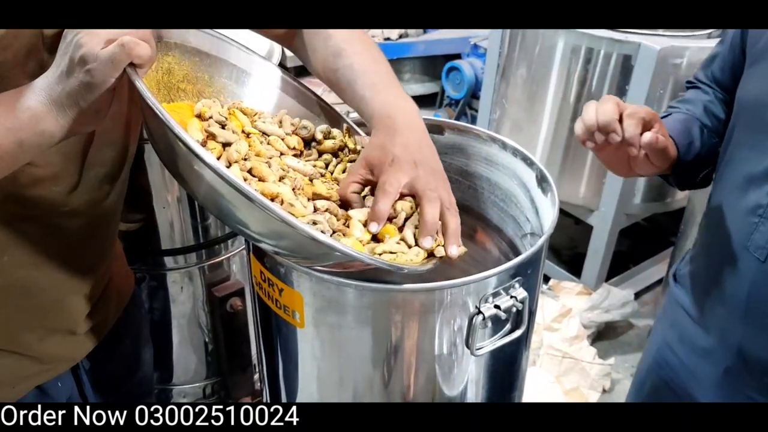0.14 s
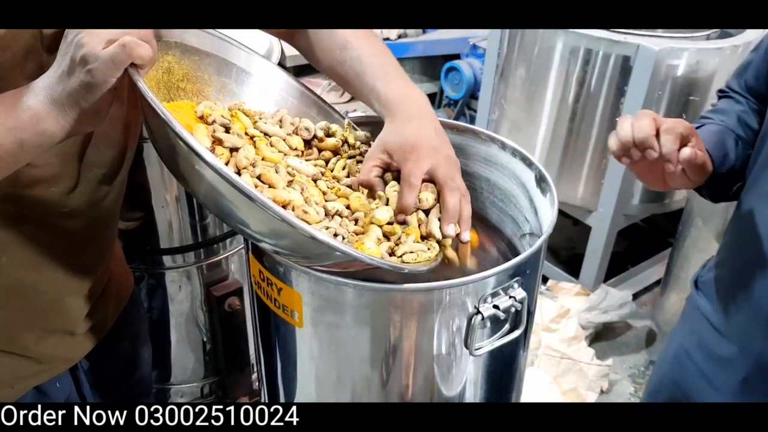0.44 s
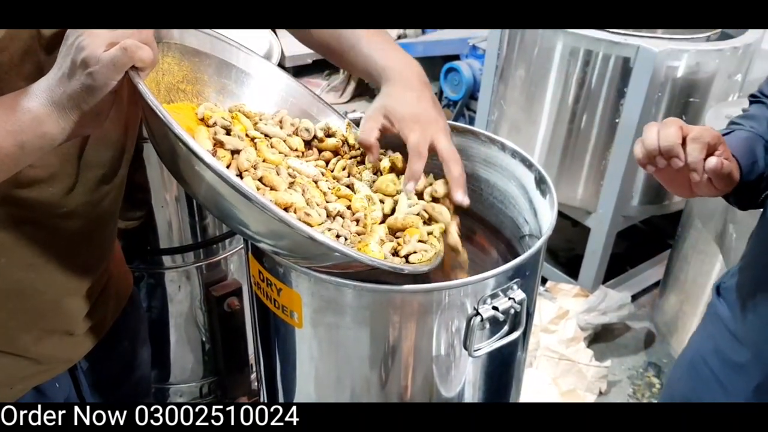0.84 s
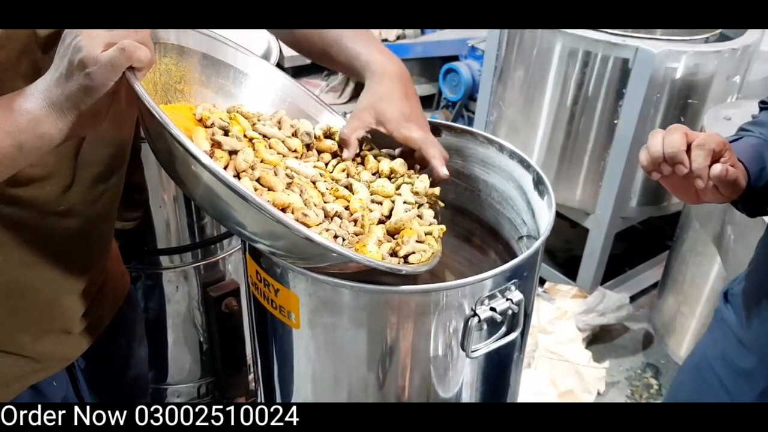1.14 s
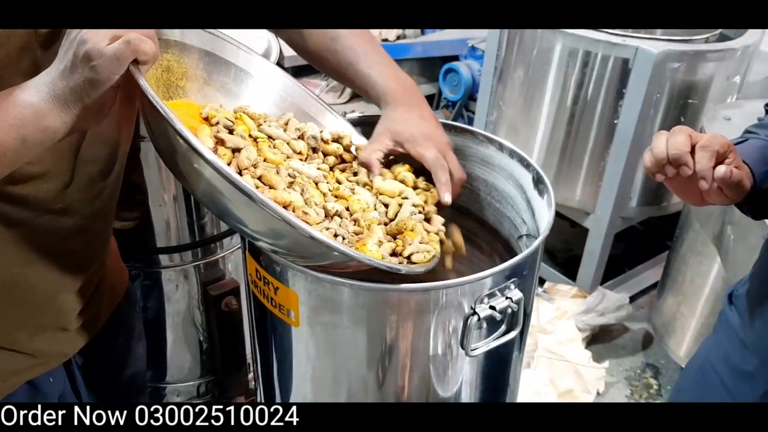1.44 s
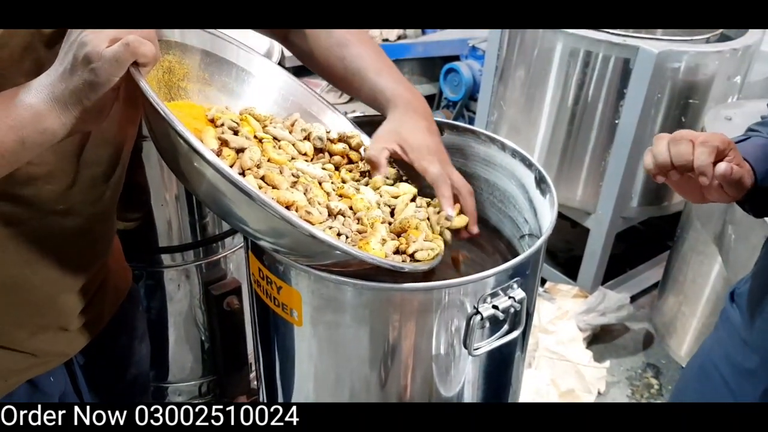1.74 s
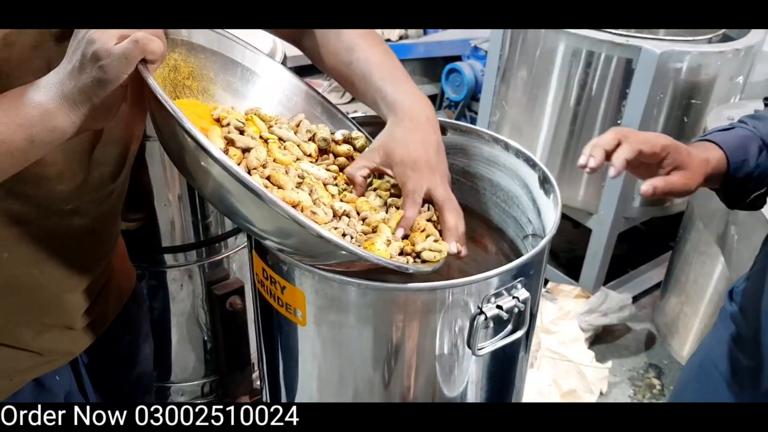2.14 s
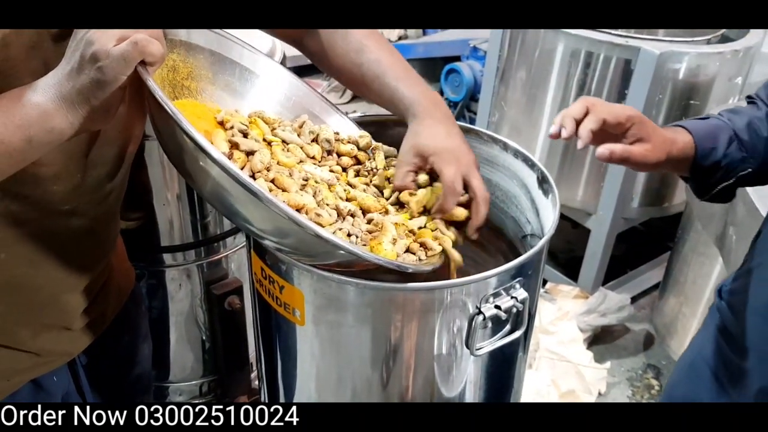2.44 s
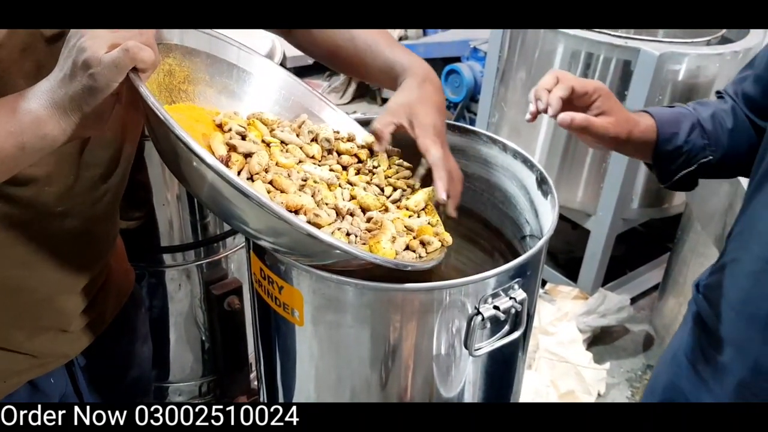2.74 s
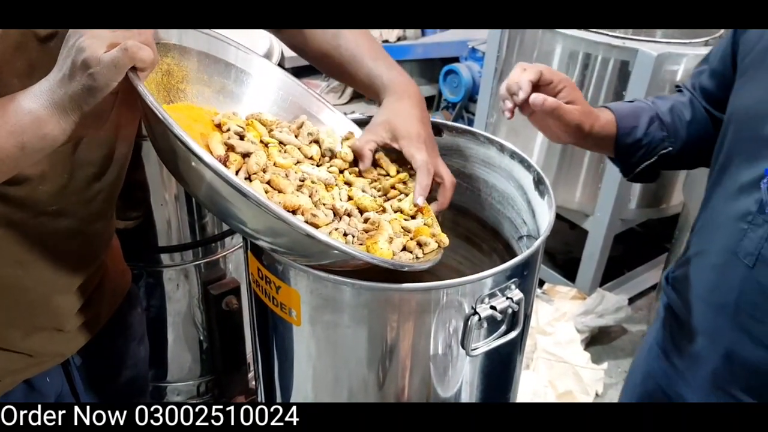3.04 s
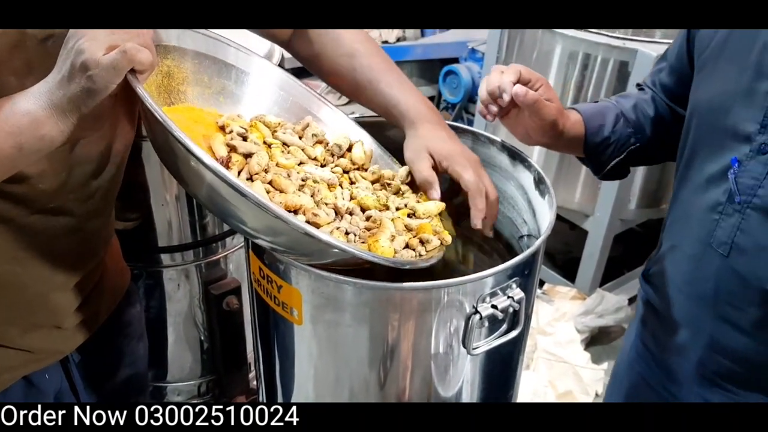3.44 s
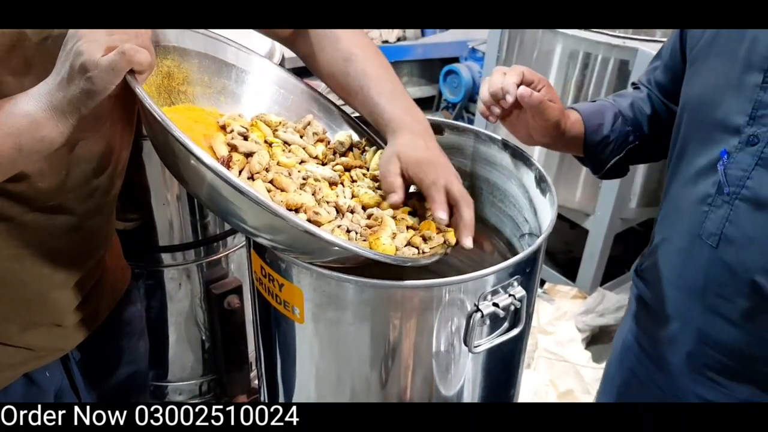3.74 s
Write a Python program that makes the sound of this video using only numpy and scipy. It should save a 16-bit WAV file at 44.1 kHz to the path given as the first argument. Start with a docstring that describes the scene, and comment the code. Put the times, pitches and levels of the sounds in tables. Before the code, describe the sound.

Close mono pickup of dry woody roots clattering into a steel drum, bright pings over hollow knocks, coming in waves, then sparse skids and a final small drop, with faint low workshop noise beneath.

```python
"""Hard dried roots are raked by hand from a steel bowl into the metal drum of a grinder.
From the start they ping on the steel (ringing modes), thud on the bottom (a short tone and modes) and
clack together (coloured noise), over a rattle of tiny random contacts that comes in waves and thins out.
Towards the end short noise rasps and squeaks skid on the bowl, and a few last roots land.
The hollow drum rings on after the hits; throughout, the workshop is dull noise with a faint hum now and then."""
import sys
import numpy as np
from scipy import signal
from scipy.fft import rfft, irfft, next_fast_len
from scipy.io import wavfile

SR = 44100
rng = np.random.default_rng(int(sys.argv[2]) if len(sys.argv) > 2 else 0)


def transcribe(u):
    """Save the signal u as a 16-bit wav file named by the first command-line argument.

    u: samples, shape (n,) or (channels, n), limited to [-1, 1]; the rate is SR.
    q: integer samples, one column per channel.
    """
    v = np.clip(np.atleast_2d(u).T, -1, 1)
    q = np.round(v * 32767).astype(np.int16)
    wavfile.write(sys.argv[1], SR, q)


N = 171990  # length of the scene, samples
T = np.arange(int(.55 * SR)) / SR  # time within one hit, s


def amp(db):
    """Decibels to gain."""
    return 10 ** (np.asarray(db) / 20)


def unit(x):
    """Scale to rms 1."""
    return x / np.sqrt(np.mean(x ** 2) + 1e-20)


def along(points, hz):
    """Read (f/Hz, value) points on a log frequency axis."""
    point_hz, value = np.transpose(points)
    return np.interp(np.log(hz + 1), np.log(point_hz + 1), value)


def near(hz, centre_hz, octaves):
    """Bell-shaped weight around a pitch."""
    return np.exp(-.5 * (np.log2((hz + 1) / centre_hz) / octaves) ** 2)


def fade(t60):
    """Exponential decay over the length of one hit, losing 60 dB in t60 seconds."""
    nepers = T.astype(np.float32) * np.float32(-np.log(1000) / max(t60, 1e-3))
    return np.exp(np.maximum(nepers, -30))


def add(track, s, sound):
    """Mix a sound into a track at a time in seconds."""
    part = track[max(round(s * SR), 0):][:len(sound)]
    part += sound[:len(part)]


def colour(x, db_of_hz):
    """Causal minimum-phase filter with the given gain curve, built by folding its cepstrum."""
    m = 2 * next_fast_len(len(x) // 2 + 1024)
    gain = amp(db_of_hz(np.fft.rfftfreq(m, 1 / SR)))
    cepstrum = irfft(np.log(gain), m)
    cepstrum[1:m // 2] *= 2
    cepstrum[m // 2 + 1:] = 0
    return irfft(rfft(x, m) * np.exp(rfft(cepstrum)), m)[:len(x)]


def noise(points, size):
    """Coloured noise of rms 1."""
    return unit(colour(rng.standard_normal(size), lambda hz: along(points, hz)))


def burst(points, t60, size=6000):
    """A short dying puff of coloured noise."""
    return noise(points, size=size) * fade(t60)[:size]


def ring(modes, boost_db, scatter_db):
    """Decaying sine modes struck with fresh strengths and phases; starts at about rms 1."""
    mode_hz, mode_db, mode_t60 = np.transpose(modes)
    chance = rng.standard_normal((len(mode_hz), 2))
    gains = amp(mode_db + boost_db + scatter_db * chance[:, 0])
    gains *= np.sqrt(2) / np.linalg.norm(gains)
    out = 0
    for gain, hz, turn, t60 in zip(gains, mode_hz, chance[:, 1], mode_t60):
        phase = (2 * np.pi * hz * T + np.pi * turn).astype(np.float32)
        out = out + gain * np.sin(phase) * fade(t60)
    return out


# how long the steel wall rings (f/Hz, t60/s)
STEEL_T60 = [(3800, 0.4), (5300, 0.31), (7000, 0.27), (10000, 0.17), (15000, 0.23)]


def wall(mode_hz, mode_db):
    """Rows of (f/Hz, level/dB, t60/s) for the steel wall."""
    return np.column_stack([mode_hz, mode_db, along(STEEL_T60, np.array(mode_hz))])


# how long the hollow drum echoes (f/Hz, t60/s)
DRUM_ECHO_T60 = [(150, 0.15), (500, 0.56), (1000, 0.89), (2800, 0.75), (5000, 0.63), (8000, 0.32),
                 (14000, 0.31)]
EARLY_T60_S = .09  # decay of the first reflections


def drum(x, early_db, tail_db, size=256):
    """Sound inside the drum: dense first reflections and a long hollow tail, drawn afresh each time."""
    # the tail is noise in short blocks, each frequency dying at its own speed
    blocks = rng.standard_normal((len(T) // size + 1, size))
    t = np.arange(len(blocks))[:, None] * size / SR
    decay = np.exp(-np.log(1000) * t / along(DRUM_ECHO_T60, np.fft.rfftfreq(size, 1 / SR)))
    tail = irfft(rfft(blocks) * decay).ravel()[:len(T)]
    early = rng.standard_normal(len(T)) * fade(EARLY_T60_S)
    answer = amp(early_db) * unit(early) + amp(tail_db) * unit(tail)
    answer[0] += np.sqrt(len(T))  # the direct sound
    return signal.fftconvolve(x, unit(answer) / np.sqrt(len(T)))[:max(len(x), len(T))]


# colour of dry root on root or bowl (f/Hz, level/dB)
ROOT_COLOUR = [(200, -23.5), (700, 5.5), (1600, -5), (3200, 2.5), (5000, 1.5), (7000, 0), (10000, -7),
               (15000, -28)]


def woody(hz, favour_db, octaves, size=6000, dull_db=7):
    """Noise in the colour of one dry root; dull_db is its loss per octave above the pitch."""
    def tone(f):
        dulling = dull_db * np.log2(np.maximum(f / hz, 1))
        return along(ROOT_COLOUR, f) + favour_db * near(f, hz, octaves) - dulling
    return unit(colour(rng.standard_normal(size), tone))


# roots striking steel (t/s, level/dB, f/Hz favoured by the spot that is hit,
# relative treble level/dB, level/dB of the part left ringing freely, at most 0)
PINGS = [(0.0094, -10, 3760, -16.5, -13), (0.0604, -9.5, 5480, -6.5, -3), (0.0768, -3, 7200, -16.5, -5.5),
         (0.0883, -6.5, 4350, -24, -8.5), (0.142, -16.5, 5350, -23, 0), (0.2562, -5, 5920, -11, -4),
         (0.2942, -5, 4300, -10.5, -4), (0.379, -5, 5100, -15, -10), (0.417, -14.5, 4650, -9, 0.5),
         (0.5067, -6, 6340, -5, -8.5), (0.5441, -9, 4800, -14, -1.5), (0.573, -11.5, 4570, -7, -6),
         (0.653, -18, 3840, -7.5, -1.5), (0.7207, -5.5, 5110, -17, -8.5), (0.7317, -7, 3840, -13, -7.5),
         (0.841, -9, 4170, -13, -13), (0.8617, -3.5, 6240, -11, -11), (0.9174, -6, 4100, -9.5, -8),
         (0.9697, -8.5, 6000, -25, -11), (1.059, -12, 6400, -4, -10), (1.2044, -8.5, 4200, -9, -14.5),
         (1.282, -16, 4580, -35, -14), (1.4047, -17, 4230, -8.5, -17), (1.6297, -10.5, 6800, -6.5, -14.5),
         (1.8683, -9.5, 4700, -10.5, -10), (1.9246, -28, 5140, 3, 3), (1.966, -5, 5880, -10, -13),
         (2.0216, -7, 6400, -5.5, -10.5), (2.1555, -20, 6640, 0, -8), (2.5923, -10, 4100, -7.5, -10.5),
         (2.6295, -10.5, 4370, -13, -6.5), (2.6744, -11.5, 4420, -9.5, -3.5), (2.711, -6, 4500, -13.5, -15),
         (2.8087, -12, 5450, -12, -11.5), (3.5531, -20, 4740, -5.5, -5.5)]
# modes of the steel wall (f/Hz) and their relative strengths (level/dB)
STEEL_HZ = [3456, 3834, 4334, 4422, 4469, 4532, 5036, 5134, 5258, 5356, 5580, 5992, 6040, 6341, 6395, 6606,
            6972, 7092, 7190, 7412]
STEEL_DB = [-15, -7, -10, -4, -2, -7, -9, -2, -2, 0, -14, -6, -12, -7, -14, -15, -13, -5, -11, -12]
# high overtones of the wall, rung by sharp contacts (f/Hz), and their relative strengths (level/dB)
OVERTONE_HZ = [8046, 8376, 8890, 9528, 9900, 10142, 10982, 11138, 11558, 11645, 11797, 12279, 12720, 12960,
               13044, 13474, 14362, 14745]
OVERTONE_DB = [-2.5, 6, 8.5, 8, 1, -7, 4, -25, 7.5, 0, 2, 3, -6, -16, 7, -33, -36, -21]
# colours of the contact noise: its crack and its bright spark (f/Hz, level/dB)
CRACK = [(500, -37.5), (1500, -9.5), (3000, -17), (5000, -28), (7000, 13.5), (9000, 3.5), (15000, -63)]
SPARK = [(5000, -17), (8500, -11), (10500, 3), (12000, 0), (14500, 5), (16000, -16)]


def pings(ring_db=-3.0, overtone_db=-4, crack_db=-15, spark_db=-11, favour_db=8, damp_t60=0.038):
    """Each blow rings the wall; roots lying against it soak up part of the ring at once."""
    out = np.zeros(N)
    rise = 1 - np.exp(-T / .002)
    for s, db, hz, treble_db, free_db in PINGS:
        favour = favour_db * near(np.array(STEEL_HZ), hz, octaves=.07)
        body = amp(ring_db) * ring(wall(STEEL_HZ, STEEL_DB), favour, scatter_db=3)
        top = amp(overtone_db + treble_db) * ring(wall(OVERTONE_HZ, OVERTONE_DB), 0, scatter_db=5)
        free = min(amp(free_db), 1)
        damping = free + (1 - free) * fade(damp_t60)
        contact = amp(crack_db) * burst(CRACK, 0.05)
        contact += amp(spark_db + treble_db) * burst(SPARK, 0.047)
        blow = (body + top) * damping + drum(contact, early_db=-4, tail_db=-3)
        add(out, s, amp(db) * rise * blow)
    return out


# roots landing on the bottom (t/s, level/dB, f/Hz, relative level/dB of the deep part of the knock)
THUDS = [(0.01, -8, 880, -17), (0.202, -9.5, 836, -6), (0.309, -10.5, 810, -4), (0.377, -22, 845, -6),
         (0.409, -20, 974, -7), (0.624, -5.5, 870, -11.5), (0.7, -18, 869, -9), (0.73, -4.5, 884, -20),
         (0.756, -6.5, 880, -17), (0.882, -5.5, 1130, -32), (0.939, -13, 970, -5), (0.966, -3, 856, -14),
         (1.039, -12, 870, -14), (1.062, -12, 1095, -27), (1.129, -9, 890, -25), (1.174, -13, 910, -11),
         (1.24, -14.5, 840, -6.5), (1.438, -15.5, 980, -27), (1.577, -17.5, 1145, 1.5),
         (1.594, -12.5, 1005, -14), (1.709, -13, 950, -7), (1.789, -21.5, 1015, -17),
         (1.895, -17.5, 902, -23), (1.927, -16.5, 1140, -12), (2.076, -16.5, 854, -4),
         (2.155, -8, 873, -22), (2.272, -16.5, 963, -23), (2.331, -17.5, 930, -18),
         (2.425, -13.5, 1026, -30), (2.452, -17.5, 906, -17), (2.513, -11, 1130, -19),
         (2.601, -10, 1126, -35), (2.615, -9, 1130, -26), (2.648, -14, 1160, -23), (2.692, -13, 1185, -24),
         (2.73, -13.5, 1148, -18), (3.523, -18, 956, -10), (3.552, -20, 780, -4), (3.604, -23.5, 840, -17),
         (3.669, -21.5, 1260, -8)]
# modes of the drum bottom and the air above it (f/Hz, level/dB, t60/s)
BOTTOM = [(168.2, -8.5, 0.28), (534, -28, 0.6), (588.2, -8, 0.55), (810, 5, 0.19), (877.5, -12.5, 0.51),
          (946, -21.5, 0.36), (959, -12.5, 0.54), (1167, 4.5, 0.28), (1257, -0.5, 0.05)]
# colours of the knock and of its deep part (f/Hz, level/dB)
KNOCK = [(25, -49), (60, -28), (170, -12.5), (260, -11.5), (480, -20), (650, -13.5), (1000, 4), (1500, -6),
         (3000, -2.5), (8000, -40)]
DEEP = [(25, -41), (80, -11), (170, -10), (260, -22.5), (400, -12.5), (590, 11.5), (720, -22.5),
        (1100, -41), (3000, -43)]


def thuds(push_db=-4, ring_db=-16, knock_db=-11, deep_db=-8, favour_db=8):
    """A landing root gives a short pitched knock and stirs the modes of the bottom."""
    out = np.zeros(N)
    rise = 1 - np.exp(-T / 0.00098)
    for s, db, hz, low_db in THUDS:
        push = amp(push_db) * np.sqrt(2) * np.sin(2 * np.pi * hz * T) * fade(0.041)
        favour = favour_db * near(np.array(BOTTOM)[:, 0], hz, octaves=0.064)
        modes = amp(ring_db) * ring(BOTTOM, favour, scatter_db=3.0)
        knock = amp(knock_db) * burst(KNOCK, 0.054)
        knock += amp(deep_db + low_db) * burst(DEEP, 0.1)
        add(out, s, amp(db) * rise * (push + modes + drum(knock, early_db=7.5, tail_db=1)))
    return out


# root against root (t/s, level/dB, f/Hz, relative level/dB of crumble and echo)
CLACKS = [(0.1994, -27, 5440, -7), (0.4095, -4, 4860, -1), (0.4647, -12, 4600, 3.5),
          (0.6177, -6.5, 4840, 1.5), (0.7311, -7.5, 3900, 3), (0.7608, -3, 4460, 2.5),
          (0.8909, -13, 5200, 7), (0.9934, -4, 4370, -1.5), (1.037, -18, 3360, -6), (1.1289, -15, 3050, -5),
          (1.2542, -19, 3020, 0), (1.4329, -16.5, 3220, -2), (1.4925, -18.5, 3680, -1.5),
          (1.5394, -18, 3050, -2.5), (1.576, -14, 4460, -2), (1.709, -15.5, 7120, -2),
          (1.7968, -18, 2600, -3), (1.8497, -19, 3470, 3), (1.8687, -16, 4490, 5), (1.895, -12, 3240, 3.5),
          (1.9248, -8.5, 5150, 4.5), (2.1555, -9.5, 6350, 1), (2.259, -18, 2800, 2), (2.3669, -14, 2960, 1),
          (2.384, -22, 3470, -6), (2.4505, -10, 3600, -0.5), (2.4732, -20, 2410, -11),
          (2.496, -12.5, 3700, 3.5), (2.5116, -7.5, 2600, -2.5), (2.5481, -15.5, 2970, -7),
          (2.6044, -13, 4960, -14), (2.6928, -6, 5200, 2.5), (3.523, -29, 6300, 1), (3.645, -10, 4000, 2.5),
          (3.6872, -16.5, 3820, 1)]


def clacks(level_db=-3, favour_db=7, crumble_db=-9, crumble_t60=0.12, tail_db=-25, tail_t60=0.92):
    """A dry snap coloured by the size of the root, a brief crumble as it settles, and the drum's echo."""
    out = np.zeros(N)
    # three envelopes shape the same noise
    snap = .6 * fade(.018) * (1 - np.exp(-T / .0007))
    crumble = amp(crumble_db) * fade(crumble_t60) * (1 - np.exp(-T / .003))
    echo = amp(tail_db) * fade(tail_t60) * (1 - np.exp(-T / 0.0032))
    for s, db, hz, echo_db in CLACKS:
        wood = woody(hz, favour_db, octaves=.35, size=len(T))
        add(out, s, amp(db + level_db) * wood * (snap + amp(echo_db) * (crumble + echo)))
    return out


def grains(rate, hz, spread, cycles, size_db):
    """Random tiny contacts, each a few cycles at its own pitch within spread octaves either way."""
    chance = rng.random((int(rate * N / SR), 3))  # moment, pitch, size
    t = T[:SR // 50]
    pitch = hz * 2 ** (spread * (2 * chance[:, 1:2] - 1))
    size = amp(-size_db * np.log(.04 + .96 * chance[:, 2:]))  # many small, few large
    waves = size * np.sqrt(pitch) * np.sin(2 * np.pi * pitch * t) * np.exp(-pitch * t / cycles)
    at = (chance[:, :1] * N).astype(int) + np.arange(len(t))
    return np.bincount(at.ravel(), waves.ravel(), N)[:N]


# flow of loose pieces (t/s, level/dB of small chatter, level/dB of tumbling on the bottom)
FLOW = [(0.0, -23.5, -32.5), (0.32, -27, -29.5), (0.46, -24, -30), (0.69, -28.5, -33), (0.92, -23, -28.5),
        (1.1, -23.5, -26), (1.25, -25, -28), (1.37, -34, -36), (2.02, -30.5, -33.5), (2.23, -35.5, -37),
        (2.44, -35, -39), (2.61, -22, -33), (3.04, -41.5, -40.5), (3.33, -48.5, -49), (3.52, -42.5, -40),
        (3.64, -39.5, -39.5), (3.77, -41, -46), (3.9, -46, -46)]
# colours of the chatter and of the tumbling (f/Hz, level/dB)
CHATTER = [(300, -23), (1000, -5.5), (1600, -6), (2400, -4.5), (3400, 0.5), (4800, -1.5), (6500, -5.5),
           (9000, -12.5), (12000, -17), (14500, -28), (16000, -45)]
TUMBLE = [(25, -60), (80, -21.5), (170, -11.5), (250, -23), (460, -14.5), (600, 0.5), (720, -7.5),
          (880, 4.5), (1150, -4.5), (1500, -1.5), (2500, -30)]
PIECES_PER_S, TUMBLES_PER_S = 330, 130


def rattle(chatter_db=-1, tumble_db=-1, shimmer_db=-8):
    """Small pieces chatter and tumble as the hand pushes them over the rim, and keep the wall ringing."""
    s, small_db, low_db = np.transpose(FLOW)
    t = np.arange(N) / SR
    small_flow = amp(np.interp(t, s, small_db))
    low_flow = amp(np.interp(t, s, low_db) + tumble_db)
    pieces = grains(PIECES_PER_S, hz=4460, spread=1.737, cycles=1.85, size_db=3)
    pieces = colour(pieces, lambda f: along(CHATTER, f))
    chatter = small_flow * unit(drum(pieces, early_db=1, tail_db=1))
    wall_ring = ring(wall(STEEL_HZ, STEEL_DB), 0, scatter_db=-0.5)
    shimmer = small_flow * unit(signal.fftconvolve(pieces, wall_ring)[:N])
    low = grains(TUMBLES_PER_S, hz=674, spread=1.52, cycles=0.47, size_db=3)
    low = colour(low, lambda f: along(TUMBLE, f))
    tumble = low_flow * unit(drum(low, early_db=0.5, tail_db=2))
    return amp(chatter_db) * chatter + amp(shimmer_db) * shimmer + tumble


# roots skidding briefly on the bowl (t/s, level/dB, f/Hz, width/octaves, swell/s)
SKIDS = [(3.09, -31.5, 4970, 0.94, 0.0033), (3.226, -30.5, 3800, 1, 0.004), (3.266, -23.5, 3360, 1, 0.0027),
         (3.332, -31.5, 8400, 0.56, 0.0023), (3.36, -23.5, 4584, 0.049, 0.0036),
         (3.451, -24, 5830, 0.96, 0.0052), (3.468, -34, 4760, 0.2, 0.0039),
         (3.549, -19, 6200, 0.52, 0.0035), (3.564, -18.5, 4530, 0.027, 0.0061),
         (3.601, -28, 6700, 0.93, 0.0029)]


def skids(tail_db=-12):
    """A root slips on the bowl: a short rasp, or a squeak when its band is narrow."""
    out = np.zeros(N)
    for s, db, hz, width, swell_s in SKIDS:
        rasp = woody(hz, 27.2, width, dull_db=0.5)
        u = T[:len(rasp)] / max(swell_s, .001)
        swell = u ** 2 * np.exp(2 * (1 - u))  # peaks at 1 after swell_s
        stroke = unit(rasp * swell) * np.sqrt(np.mean(swell ** 2))
        add(out, s, amp(db) * drum(stroke, early_db=0.5, tail_db=tail_db))
    return out


# colour of the room noise (f/Hz, level/dB)
WORKSHOP = [(20, -26), (45, -13), (66, 0.5), (95, -3.5), (170, -0.5), (280, -8.5), (600, -13), (1500, -7.5),
            (4000, -54), (8000, -43), (12000, -52), (16000, -77)]
WORKSHOP_DB = -49.5
# a faint low hum comes and goes (t/s, length/s, f/Hz, level/dB)
HUM = [(.03, 0.71, 121, -44.5), (1.053, 0.87, 76.1, -52.5), (2.852, .7, 64.4, -54)]


def workshop():
    """Dull room noise with a low sine hum that swells and fades."""
    out = amp(WORKSHOP_DB) * noise(WORKSHOP, size=N)
    for s, length, hz, db in HUM:
        t = np.arange(int(length * SR)) / SR
        swell = np.sin(np.pi * t / length)
        add(out, s, amp(db) * np.sqrt(2) * np.sin(2 * np.pi * hz * t) * swell)
    return out


def scene():
    """The pour over the low hum of the workshop, as one channel."""
    mix = pings() + thuds() + clacks() + rattle() + skids() + workshop()
    return mix[None]


TOP_HZ = 15300  # band limit of the recorder


def record(dry):
    """The recorder rounds the highest peaks and cuts steeply above its band limit."""
    rounded = dry / (1 + np.abs(dry / .95) ** 6) ** (1 / 6)
    m = next_fast_len(N + SR // 2)
    cut = np.sqrt(1 + (np.fft.rfftfreq(m, 1 / SR) / TOP_HZ) ** 160)
    return irfft(rfft(rounded, m) / cut, m)[:, :N]


dry = scene()
out = record(dry)
transcribe(out)
```